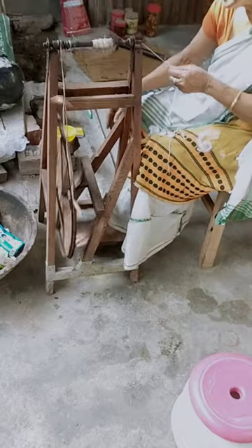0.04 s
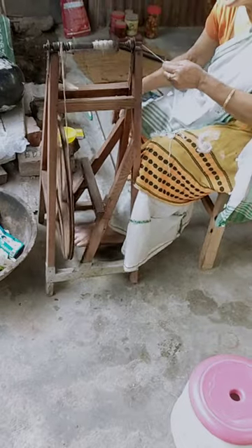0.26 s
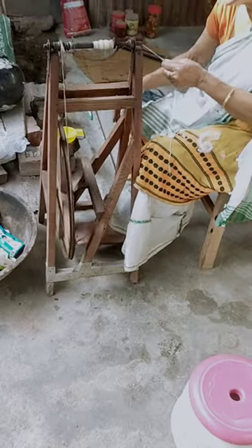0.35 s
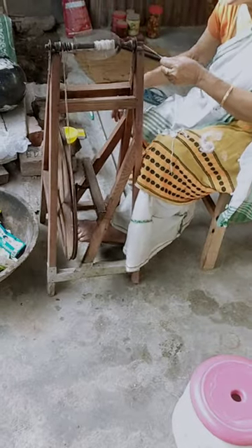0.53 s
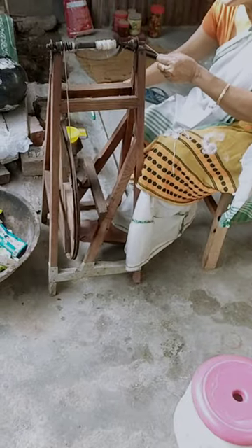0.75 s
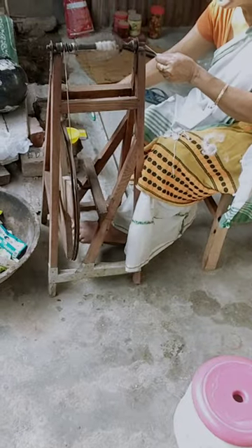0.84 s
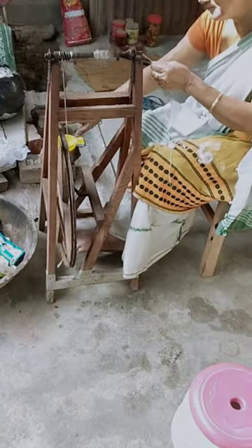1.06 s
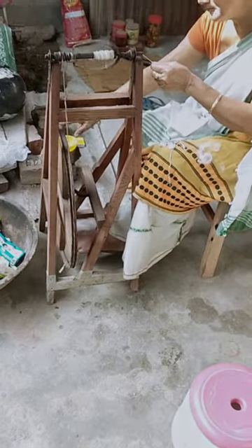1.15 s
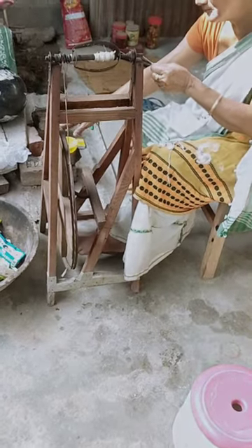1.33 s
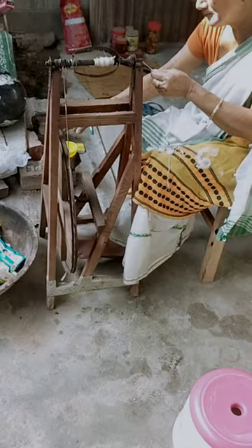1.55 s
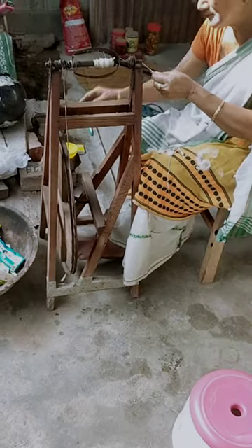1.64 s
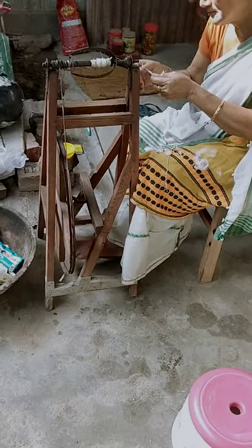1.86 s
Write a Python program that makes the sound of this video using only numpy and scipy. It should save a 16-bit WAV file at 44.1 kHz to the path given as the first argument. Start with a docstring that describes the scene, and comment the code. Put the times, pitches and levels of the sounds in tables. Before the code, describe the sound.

Heard from nearby indoors, a foot-driven spinning wheel runs with a rattling whirr, its wooden pedal knocking and small parts ticking. The whirr soon dies away, ending in a faint metallic scrape over quiet room air.

```python
"""A spinning wheel runs down

A wooden, foot-driven wheel whirrs in a small room. Its flyer (the part that twists the yarn) chatters
on its spindle, rings the frame and ticks. Yarn hisses as it is drawn in, and the foot pedal knocks.
It stops with a thin ringing scrape and soft bumps, over room air, a faint hum and a low rumble."""
import sys
import numpy as np
from scipy import signal
from scipy.fft import rfft, irfft
from scipy.io import wavfile
from scipy.ndimage import uniform_filter1d

SR = 44100
rng = np.random.default_rng(int(sys.argv[2]) if len(sys.argv) > 2 else 0)


def dump_mix(stems):
    """Bounce the given channels to the path in sys.argv[1] as a 16-bit WAV at rate SR."""
    frames = np.atleast_2d(stems).T  # one column per channel
    limited = np.clip(frames, -1, 1)  # hard clip at full scale
    pcm = np.round(limited * 32767).astype(np.int16)
    wavfile.write(sys.argv[1], SR, pcm)


N = 83790

# How loud the flyer runs (time [s], level [dB])
FLYER_LEVEL = [(.19, -46.5), (.35, -46.5), (.37, -43.5), (.52, -43), (.63, -42.5), (.76, -43), (.87, -43),
               (.96, -44.5), (1.07, -44.5), (1.16, -46), (1.23, -44.5), (1.34, -50.5), (1.42, -60),
               (1.53, -64), (1.84, -64), (1.9, -68)]
# Tone of the whirr (frequency [Hz], level [dB])
WHIRR_TONE = [(60, -21.5), (200, -18.5), (450, -11), (700, -5.5), (1000, -5.5), (1550, -1), (2250, -3),
              (2900, -10), (4200, -15), (5400, -23.5), (8000, -26), (10000, -36.5), (15500, -30)]
# Ringing notes of the frame and flyer (frequency [Hz], width [Hz], level [dB])
FRAME_NOTES = [(955, 64, 2), (1080, 89, -7.5), (1254, 26.4, 1), (2076, 68, -4), (2343, 35, -10.5),
               (3800, 23, -5.5), (4220, 86, -1.5), (4990, 75, -6)]
# Boost or cut of the whirr's treble (time [s], gain [dB])
WHIRR_TREBLE = [(.19, 4), (.4, 2), (.6, 1), (.85, 0), (1.0, -5.5), (1.25, -4), (1.45, -7), (1.9, 0)]
# How loud the big wheel rolls (time [s], level [dB])
WHEEL_LEVEL = [(.19, -78), (.38, -60), (.8, -62), (1.1, -58.5), (1.33, -54), (1.44, -61), (1.58, -83)]
# Tone of the rolling (frequency [Hz], level [dB])
WHEEL_TONE = [(50, -11.5), (110, -11), (280, 0), (450, -7.5), (750, 4.5), (1100, -3), (2000, -19.5),
              (5000, -69)]
# Tone of the room air (frequency [Hz], level [dB])
AIR_TONE = [(100, -6.5), (400, -5.5), (900, -5), (2000, -9), (3200, -18.5), (5800, -24.5), (7700, -19),
            (10000, -28.5), (12500, -34), (15500, -26.5)]
# Tone of the rumble (frequency [Hz], level [dB])
RUMBLE_TONE = [(5, -2), (15, 4.5), (35, -8.5), (60, -12.5), (120, -17), (220, -20.5), (500, -43)]
# How the rumble swells (time [s], level [dB])
RUMBLE_SWELL = [(.19, -54), (.27, -67.5), (.52, -59.5), (1.3, -58), (1.5, -54.5), (1.6, -57), (1.85, -58.5)]
# The faint hum (time [s], pitch [Hz], level [dB])
HUM_PATH = [(1.0, 168, -88), (1.23, 169.9, -66), (1.45, 155.3, -77.5), (1.65, 150.7, -70),
            (1.9, 149, -73.5)]
# Pulls of yarn (start [s], hold [s], fade [s], level [dB])
YARN_PULLS = [(0.358, 0.023, 0.085, -61), (0.553, 0.092, 0.32, -62), (1.048, 0.085, 0.14, -60)]
# Tone of the sliding yarn (frequency [Hz], level [dB])
YARN_TONE = [(1500, -7), (3800, 4), (5200, -2), (6100, 5), (6800, -9), (7900, 6.5), (9800, -11),
             (15500, -9)]
# Ticks of the flyer (time [s], relative snap level [dB], relative clack level [dB])
FLYER_TICKS = [(0.362, -49, -38), (0.3717, -35, -32), (0.41, -36, -55), (0.4148, -52, -38.5),
               (.471, -44, -62), (0.511, -39, -40), (0.561, -41, -40.5), (0.566, -54, -39.5),
               (0.75, -32, -46), (1.008, -66, -46.5), (1.430, -46, -75)]
# Tone of a tick's high snap (frequency [Hz], level [dB])
SNAP_TONE = [(2000, -38), (8000, -8), (11500, -6), (15500, 6)]
# Tone of a tick's lower clack (frequency [Hz], level [dB])
CLACK_TONE = [(800, -7), (2400, 3), (4100, -14), (5000, 4), (5900, -7), (7100, -1.5), (9500, -19),
              (15500, -40)]
# Knocks of the pedal (time [s], strength [dB], brightness [dB per octave])
PEDAL_KNOCKS = [(0.4178, -25.5, -1), (.430, -32, -11), (.4385, -40, -5), (.446, -36, 1), (0.465, -36, 4),
                (.487, -38, 3), (.648, -35, 8), (0.7509, -30, -4), (.86, -38, 9)]
# Ringing notes of the pedal (frequency [Hz], level [dB], time to fade by 60 dB [s])
PEDAL_NOTES = [(800, -1.5, 0.19), (924, -1.5, 0.095), (1116, 12, 0.035), (1707, -0.5, 0.038)]
# Soft bumps (time [s], pitch [Hz], level [dB])
LOW_BUMPS = [(.545, 54.5, -60), (1.47, 105, -61), (1.643, 32, -48.5), (1.803, 34, -50)]
# Ringing notes of the scraped metal (frequency [Hz], width [Hz], level [dB])
METAL_NOTES = [(1860, 107, -1), (3090, 70, -7.5), (3474, 50, -0.5), (4150, 60, -10), (4930, 45, -11),
               (5560, 63, -14), (6930, 110, -15), (8080, 330, -5), (12230, 220, -15)]
# Tone of the scrape's hiss (frequency [Hz], level [dB])
SCRAPE_TONE = [(1500, -10), (3700, 1), (5100, -4), (7600, 2), (9800, -10), (15500, -8)]


def undb(db):
    """Turn decibels into a number to multiply by."""
    return 10 ** (np.asarray(db) / 20)


def unit(x):
    """Scale a sound to an average strength (rms) of 1."""
    return x / np.sqrt(np.mean(x ** 2))


def curve(rows, column=1):
    """Join one column of a table with straight lines over time."""
    rows = np.array(rows)
    return np.interp(np.arange(N) / SR, rows[:, 0], rows[:, column])


def colour(x, tone):
    """Filter a sound by a tone table."""
    hz, db = np.array(tone).T
    size = 2 * N
    freqs = np.maximum(np.fft.rfftfreq(size, 1 / SR), 1)
    gain = undb(np.interp(np.log(freqs), np.log(hz), db))
    cepstrum = irfft(np.log(gain))
    cepstrum[1:N] *= 2  # fold it so the filter never rings ahead of the sound
    cepstrum[N + 1:] = 0
    return irfft(rfft(x, size) * np.exp(rfft(cepstrum)))[:N]


def noise(tone):
    """Noise of strength 1 with the given tone."""
    return unit(colour(rng.standard_normal(N), tone))


def wander(rate_hz):
    """A smooth random drift of strength 1."""
    step = int(SR / rate_hz)
    stairs = np.repeat(rng.standard_normal(N // step + 1), step)
    return unit(uniform_filter1d(stairs, step)[:N])


def since(start):
    """Seconds since a moment, zero before it."""
    return np.maximum(np.arange(N) / SR - start, 0)


def room(x, echo_db, fade_s=0.4, gap_s=0.00521, damping_hz=8600):
    """Add a short, duller echo from the floor and walls."""
    age = since(gap_s)
    tail = rng.standard_normal(N) * (age > 0) * np.exp(-np.log(1000) * age / fade_s)
    tail = signal.sosfilt(signal.butter(2, damping_hz, fs=SR, output="sos"), tail / np.linalg.norm(tail))
    return x + undb(echo_db) * signal.fftconvolve(x, tail)[:N]


def flyer(chatter_hz=300, full_speed_db=-43, db_per_doubling=16, rub_db=2, treble_hz=3060):
    """Uneven taps and smooth rubbing in the bearing ring the frame; the taps slow as the whirr fades."""
    level_db = curve(FLYER_LEVEL)
    tap_rate = chatter_hz * 2 ** ((level_db - full_speed_db) / db_per_doubling)
    tap_count = np.cumsum(tap_rate * np.exp(0.3 * wander(150))) / SR
    taps = np.diff(np.floor(tap_count), prepend=0) * undb(2.2 * rng.standard_normal(N))
    push = unit(taps / np.sqrt(tap_rate)) + undb(rub_db) * rng.standard_normal(N)
    ringing = sum(undb(db) * signal.lfilter(*signal.iirpeak(hz, hz / width, SR), push)
                  for hz, width, db in FRAME_NOTES)
    whirr = unit(room(colour(push + ringing, WHIRR_TONE), echo_db=-2))
    treble = signal.sosfiltfilt(signal.butter(2, treble_hz, "high", fs=SR, output="sos"), whirr)
    whirr += treble * (undb(curve(WHIRR_TREBLE)) - 1)
    return whirr * undb(level_db + 0.75 * wander(40.6))


def wheel():
    """The big wheel rolls on its axle, loudest just before it stops."""
    return undb(curve(WHEEL_LEVEL)) * unit(room(noise(WHEEL_TONE), echo_db=-2))


def background(air_db=-61.5):
    """Room air, a swelling low rumble and a faint wavering hum."""
    hum_hz = curve(HUM_PATH) * (1 + 0.0174 * wander(26.16))
    hum = np.sqrt(2) * np.sin(2 * np.pi * np.cumsum(hum_hz) / SR)
    air = undb(air_db) * noise(AIR_TONE)
    rumble = undb(curve(RUMBLE_SWELL)) * noise(RUMBLE_TONE)
    return air + rumble + undb(curve(HUM_PATH, column=2)) * hum


def yarn(rise_s=0.018):
    """Yarn hisses through the fingers onto the spool in short pulls."""
    loudness = np.zeros(N)
    for start, hold, fade, db in YARN_PULLS:
        corners = start + np.cumsum([0, rise_s, hold, fade])
        loudness += undb(db) * np.interp(np.arange(N) / SR, corners, [0, 1, 1, 0])
    flicker = undb(0.99 * wander(110))
    return flicker * loudness * noise(YARN_TONE)


def ticks(snap_s=0.0026, clack_s=0.0035):
    """Small hard hits on the flyer each make a thin snap and a lower clack."""
    snap, clack = np.zeros(N), np.zeros(N)
    for start, snap_db, clack_db in FLYER_TICKS:
        age = since(start)
        snap += undb(snap_db) * (age > 0) * np.exp(-age / snap_s)
        clack += undb(clack_db) * (age > 0) * np.exp(-age / clack_s)
    return room((snap * noise(SNAP_TONE) + clack * noise(CLACK_TONE)) / 2, echo_db=-9)


def pedal(pivot_hz=1000, low_cut_hz=560):
    """The pedal's loose wooden links knock and bounce, each hit ringing a little differently."""
    knocks = np.zeros(N)
    for start, strength_db, brightness in PEDAL_KNOCKS:
        age = since(start)
        ring = np.zeros(N)
        for hz, db, fade_s in PEDAL_NOTES:
            gain = undb(db + brightness * np.log2(hz / pivot_hz))
            pitch = hz * (1 + 0.019 * rng.standard_normal())
            ring += gain * np.exp(-np.log(1000) * age / fade_s) * np.sin(2 * np.pi * pitch * age)
        knocks += undb(strength_db) * ring / np.abs(ring).max()
    low_cut = signal.butter(2, low_cut_hz, "high", fs=SR, output="sos")  # the knocks keep little bass
    return room(signal.sosfilt(low_cut, knocks), echo_db=-1.5)


def bumps(width_s=0.012):
    """Soft low bumps of a wave or two, most as the wheel comes to rest."""
    t = np.arange(N) / SR
    return sum(undb(db) * np.exp(-((t - at) / width_s) ** 2) * np.sin(2 * np.pi * (hz * t + rng.random()))
               for at, hz, db in LOW_BUMPS)


def scrape(start_s=1.55, rise_s=0.034, hold_s=0.014, fade_s=0.071, gain_db=-58.5):
    """A light rub as the wheel stops sets metal ringing thinly over a bright hiss."""
    ringing = np.zeros(N)
    for hz, width, db in METAL_NOTES:
        note = signal.lfilter(*signal.iirpeak(hz, hz / width, SR), rng.standard_normal(N))
        ringing += undb(db) * unit(note)
    hiss = undb(-4) * noise(SCRAPE_TONE)
    rise = np.minimum(since(start_s) / rise_s, 1)
    fall = np.exp(-since(start_s + rise_s + hold_s) / fade_s)
    return room(undb(gain_db) * rise * fall * (unit(ringing) + hiss), echo_db=0.5)


def scene():
    """The spinning wheel and the room, in one channel."""
    return (flyer() + wheel() + pedal() + ticks() + yarn() + scrape() + bumps() + background())[None]


def record(dry, start_s=0.192, top_hz=15900):
    """Keep a short silence at the start and steeply cut the highest treble."""
    high_cut = signal.ellip(10, .2, 70, top_hz, fs=SR, output="sos")
    return signal.sosfilt(high_cut, dry * (since(start_s) > 0))


dry = scene()
out = record(dry)
dump_mix(out)
```